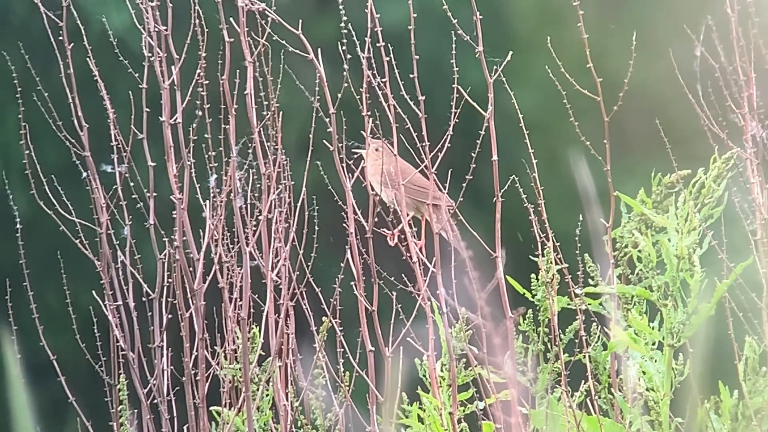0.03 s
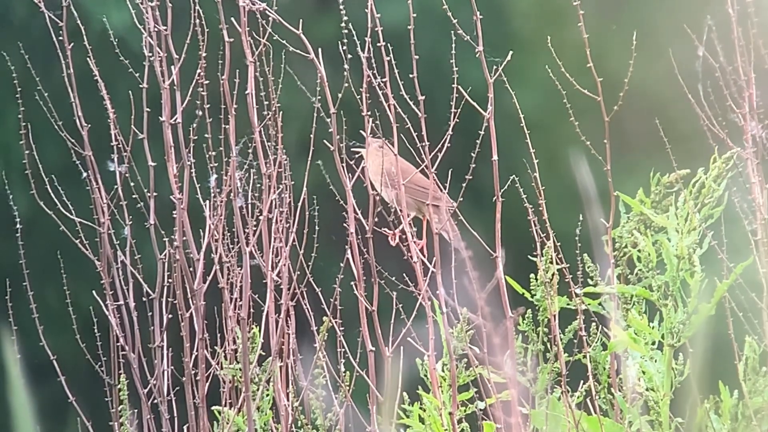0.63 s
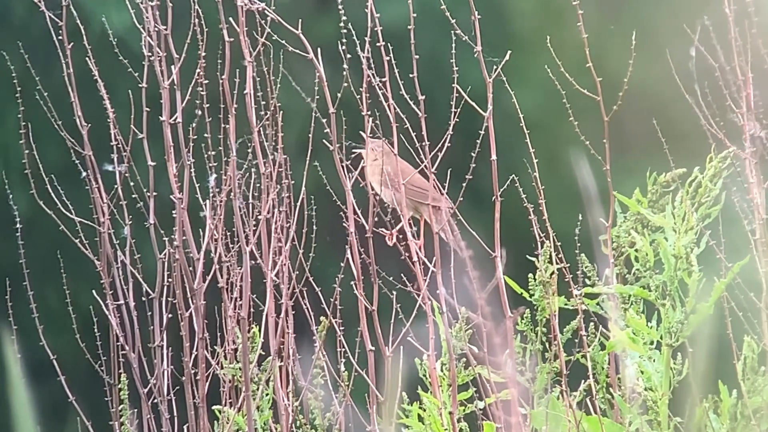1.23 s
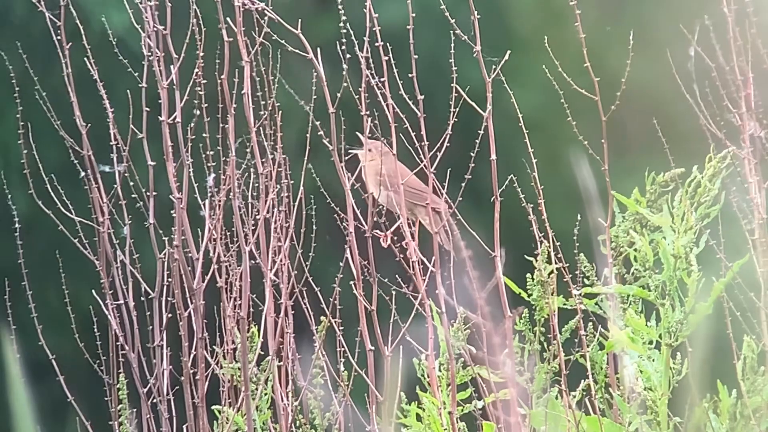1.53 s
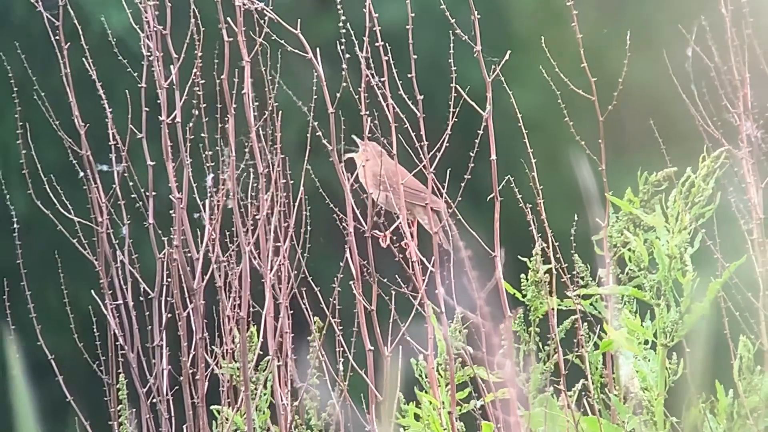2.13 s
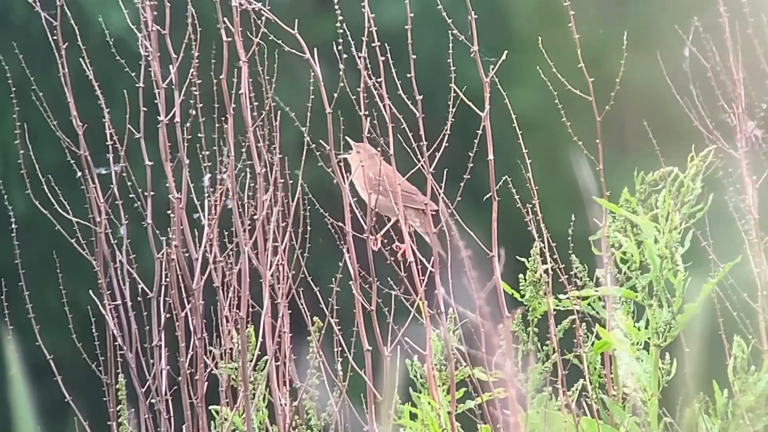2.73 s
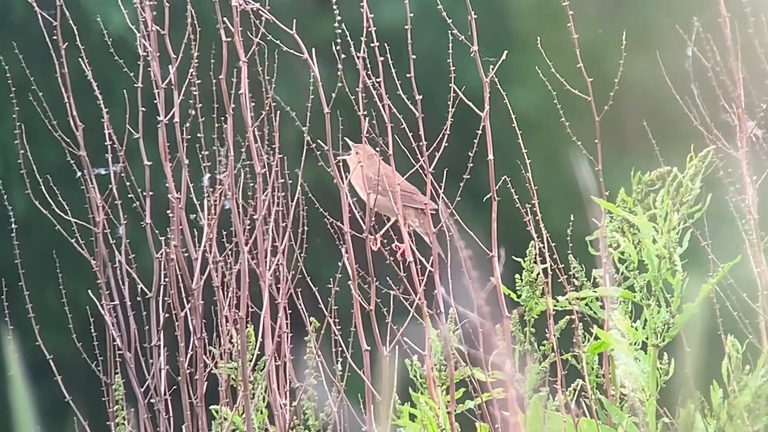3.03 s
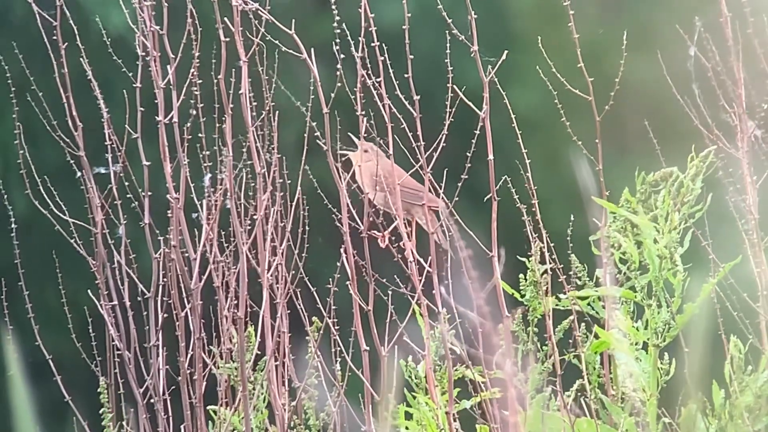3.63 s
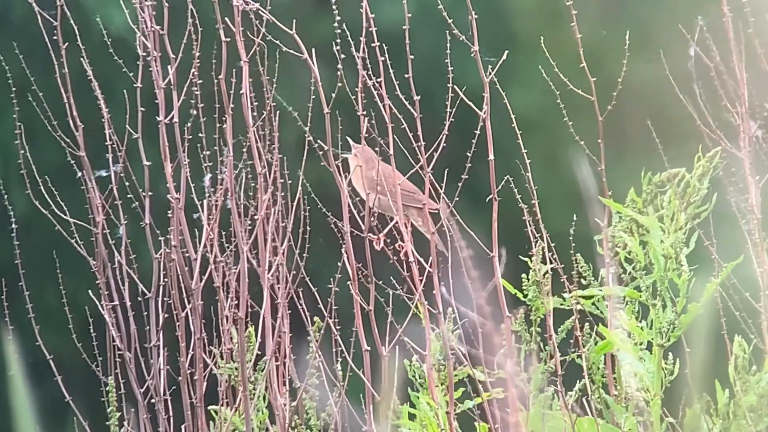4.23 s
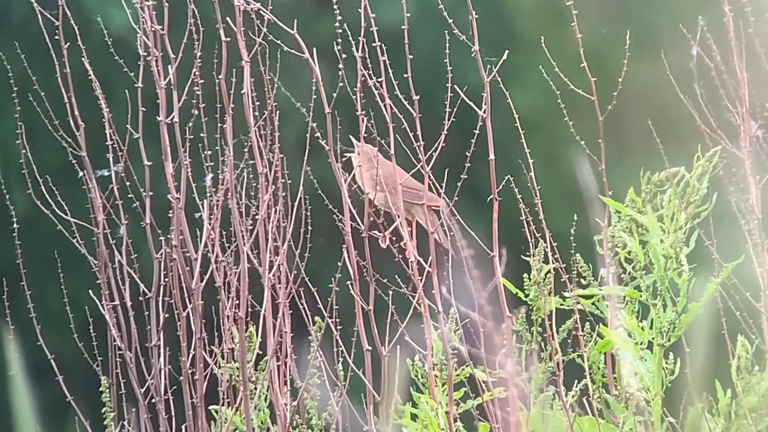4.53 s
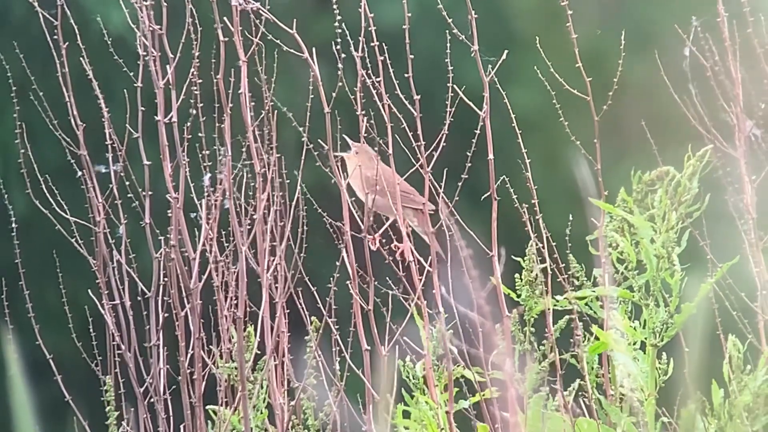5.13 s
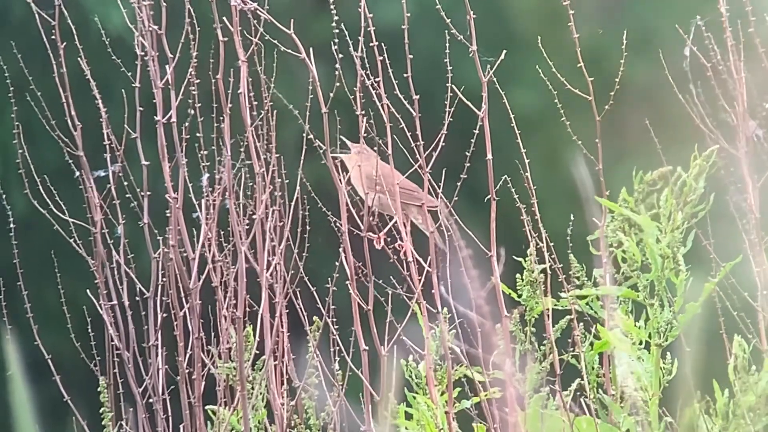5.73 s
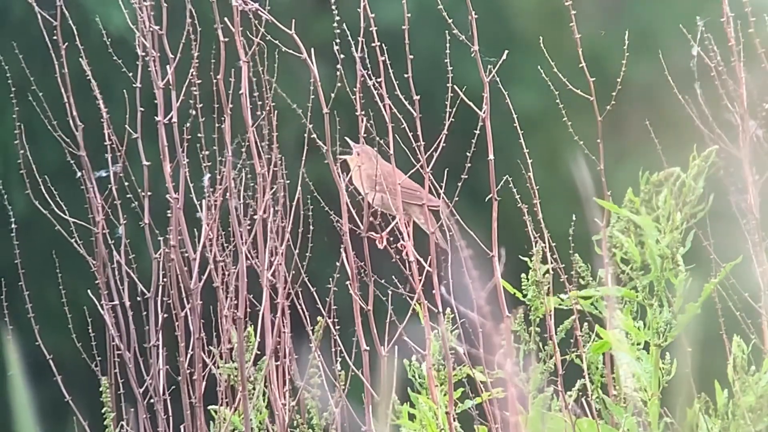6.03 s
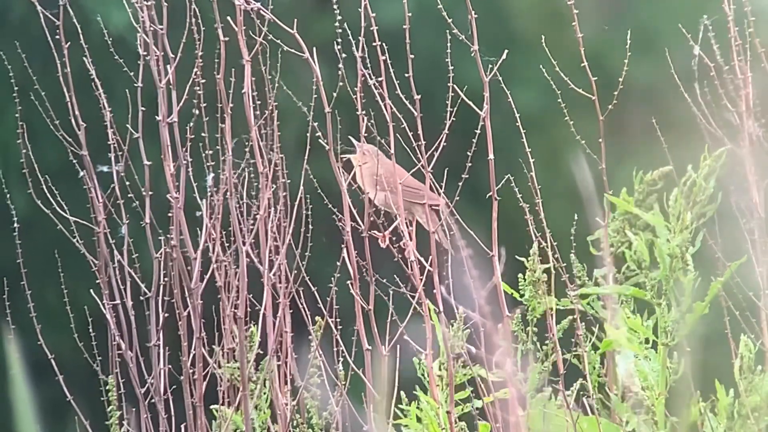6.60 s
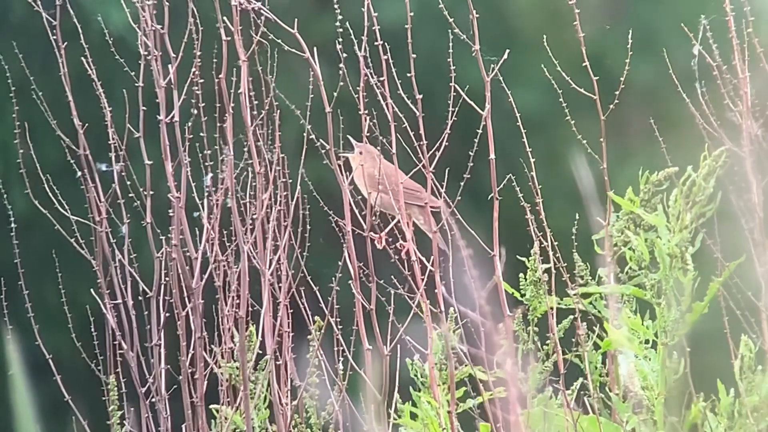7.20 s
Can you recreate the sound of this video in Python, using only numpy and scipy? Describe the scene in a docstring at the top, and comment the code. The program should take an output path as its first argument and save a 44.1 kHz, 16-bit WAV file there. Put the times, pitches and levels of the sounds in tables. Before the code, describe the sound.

A warbler sings a high, insect-like buzzing trill outdoors for the whole seven and a half seconds, pulsing evenly about nine times a second, each pulse a tiny pip and rattle. Beneath it lie soft low air noise and a steady high hiss. A second songbird nearby chatters in hurried chirps, buzzes and slurs from the start to about 1.5 seconds, adds a faint note or two near 2.3, and returns busily from 3.5 to 5.2 seconds. A distant thrush gives soft fluting whistles around 1 second, faintly near 3, and again from 5.8 to the end. Faint twittering comes from deep in the thicket, and the songs echo slightly off trees. From about 3.4 seconds, wind gusts rumble on the microphone with short low thumps, strongest between 5.6 and 6.5 seconds and again near 7.2, while the trill carries on.

```python
"""A river warbler reels its buzzing song from dry stems: nine phrases a second, each a pip, two thin
notes and a rattle, all near-sine tones of the syrinx. A second songbird chatters nearby in
frequency-modulated notes, a thrush whistles far off, and faint birds twitter in the thicket.
Stems and trees reflect the songs over a steady background: low air noise and a high hiss at 6-7 kHz.
From the middle on, the eddies of wind gusts rumble on the microphone."""
import sys
import numpy as np
from scipy import signal
from scipy.fft import rfft, irfft
from scipy.io import wavfile
from scipy.ndimage import uniform_filter1d

SR = 44100
rng = np.random.default_rng(int(sys.argv[2]) if len(sys.argv) > 2 else 0)


def log_audio(samples):
    """Write samples as a 16-bit WAV file to the path given in sys.argv[1]."""
    # one column per channel
    frames = np.atleast_2d(samples).T
    # limit to full scale, then quantise
    limited = np.clip(frames, -1, 1)
    pcm = np.round(limited * 32767).astype(np.int16)
    wavfile.write(sys.argv[1], SR, pcm)


N = 320166
FREQS = np.fft.rfftfreq(N, 1 / SR)

# Levels in the tables are relative: mixing gains and filters follow.
# the warbler's changing effort: time_s, pip_db, other_notes_gain_db, pip_octave_db
WARBLER_EFFORT = [(0, -45.5, -0.5, -31), (0.501, -45.5, 2, -16.5), (1.203, -49, -0.6, -25.5),
                  (1.9, -48.5, 0, -16.5), (2.6, -46, -3.5, -37), (3.45, -50, -1.5, -27.5),
                  (4.001, -49, -0.5, -22.5), (4.55, -54, -3, -18), (5, -50.5, 0.5, -24),
                  (5.5, -41.5, 1.5, -25), (5.898, -47, -3.2, -26), (6.5, -45, -2, -32),
                  (7.2, -48.5, -1.5, -21)]
# the two notes after each pip: delay_s, length_s, start_hz, end_hz, level_db
THIN_NOTES = [(.009, 0.008, 6865, 7480, -55), (0.0445, 0.011, 7145, 6560, -54)]
# echoes off the trees: delay_s, left_db, right_db
TREE_ECHOES = [(0.011, -22.5, -9.5), (0.0265, -16.5, -29), (0.038, -36, -18.5)]
# comb filtering of the warbler by stems and ground: frequency_hz, left_db, right_db
COMB_BANDS = [(4050, -14, -14), (4210, 2.5, 2.5), (4420, 4.5, 4.5), (4600, 2.5, 2.5), (4760, -9, -6),
              (4960, -5, -2), (5170, 4.5, 7.5), (5480, -11, -8), (5680, 6, 6.5), (5900, 5.5, 6.5),
              (6080, 1.5, 2.5), (6250, -6, -3), (6820, 3, 4), (7100, -5, -4), (7380, 6, 7)]
# steady outdoor background, low air noise plus a high hiss at 6-7 kHz: frequency_hz, density_db
BACKGROUND_SPECTRUM = [(15, -41), (28, -16), (55, 1), (100, -3.5), (220, -15.5), (600, -15), (1020, -20.5),
                       (1400, -31), (3200, -36), (5500, -30.5), (6100, -17), (7000, -25), (9000, -55)]
# likeness of the background in left and right: frequency_hz, correlation
BACKGROUND_CORRELATION = [(100, 0.83), (250, 0.82), (400, 0.15), (600, -0.33), (1000, -0.75), (2000, -0.54),
                          (6000, 0.9)]
# the chatterer's smooth slurs: start_s, length_s, level_db, start_hz, middle_hz, end_hz
SLURS = [ (0.051, 0.12, -58.5, 3580, 3920, 4860), (0.231, 0.097, -56.5, 3620, 3780, 4700),
         (0.426, 0.039, -48, 4510, 3770, 3780), (0.5, 0.034, -42, 3630, 3787, 3800),
         (0.573, 0.085, -59.5, 3180, 3130, 3065), (0.699, 0.029, -49.5, 2620, 3930, 3970),
         (0.894, 0.021, -49.5, 4220, 3840, 3650), (0.966, 0.013, -52.5, 3620, 3900, 3700),
         (1.36, 0.029, -59, 3180, 3040, 3100), (2.265, 0.027, -64, 3500, 3820, 3700),
         (2.388, 0.077, -58.5, 3550, 4024, 3840), (3.585, 0.035, -53.5, 4060, 4160, 3880),
         (3.728, 0.042, -43.5, 3210, 3280, 3690), (3.883, 0.021, -43, 3130, 3540, 3160),
         (4.033, 0.018, -47, 3820, 3480, 2980), (4.122, 0.03, -43, 3780, 3533, 3320),
         (4.36, 0.035, -46.5, 5860, 5410, 5780), (5.191, 0.032, -55, 2437, 3070, 3140),
         (4.676, 0.036, -45.5, 3460, 3310, 3170)]
# its buzzes: start_s, length_s, level_db, start_hz, end_hz, warble_hz, depth_hz, rasp_hz
BUZZES = [ (0.238, 0.069, -55.5, 5270, 5400, 130, 202, 302),
          (0.287, 0.094, -52.5, 6420, 6050, 90, 354, 400), (0.444, 0.066, -45.5, 3490, 3592, 112, 339, 86),
          (0.606, 0.083, -55, 5500, 4900, 200, 347, 710), (0.721, 0.033, -43.5, 3840, 3330, 183, 367, 130),
          (0.813, 0.041, -51.5, 5370, 4620, 120, 149, 510), (0.999, 0.04, -53.5, 2870, 2435, 110, 292, 210),
          (1.181, 0.024, -50.5, 3640, 3570, 72, 250, 220), (1.281, 0.051, -51.5, 3976, 3023, 96, 280, 300),
          (1.443, 0.078, -58, 2560, 2910, 107, -400, 350), (1.56, 0.031, -57.5, 3155, 3010, 133, 356, 280),
          (3.469, 0.097, -55, 4460, 4910, 130, 135, 404), (3.561, 0.032, -49.5, 4600, 4080, 130, 80, 200),
          (3.719, 0.028, -57, 3210, 3360, 230, 397, 199), (3.785, 0.091, -52.5, 3950, 4310, 152, 177, 240),
          (3.894, 0.081, -48, 3000, 3220, 61, 450, 20), (4.139, 0.028, -42, 3892, 3083, 115, 295, 80),
          (4.328, 0.08, -48.5, 5860, 5660, 120, 260, 260), (4.546, 0.043, -49.5, 3230, 4130, 340, 551, 247),
          (4.578, 0.053, -55.5, 5000, 4670, 150, 192, 410), (4.759, 0.057, -50, 2960, 3915, 167, -380, 300),
          (4.849, 0.021, -61, 3250, 2940, 136, 302, 100), (4.928, 0.057, -52, 3190, 3410, 152, -380, 120),
          (4.988, 0.052, -54, 5350, 4630, 113, 256, 450), (5.051, 0.029, -44.5, 3740, 3760, 140, 405, 160),
          (5.153, 0.1, -59, 2620, 2670, 100, 220, 250)]
# its chips, single or in runs: start_s, count, level_db, pitch_hz, sweep_octaves
CHIPS = [(0.842, 3, -45.5, 3634, -0.55), (0.982, 1, -51, 2930, 0.28), (3.469, 1, -57.5, 3440, -0.24),
         (4.205, 3, -48.5, 2766, 0.22), (4.313, 1, -50, 3610, 0.56), (4.453, 1, -47, 3310, 0.28),
         (4.49, 1, -55, 2820, -0.5), (5.078, 2, -44, 3574, -0.44)]
# its throat, which weakens the lowest notes: frequency_hz, gain_db
THROAT_RESPONSE = [(1500, -30), (2000, -12), (2500, 0), (6500, 0)]
# the thrush's whistles: start_s, length_s, level_db, start_hz, middle_hz, end_hz
WHISTLES = [ (0.822, 0.066, -63.5, 2120, 2484, 2620), (0.882, 0.22, -76, 1730, 1845, 2025),
            (1.131, 0.063, -63, 2260, 2410, 2670), (1.27, 0.1, -75.5, 2220, 2050, 1910),
            (1.324, 0.069, -64.5, 2700, 2365, 2410), (2.831, 0.048, -69.5, 2630, 2480, 2670),
            (2.912, 0.059, -74, 1760, 1850, 1780), (3.229, 0.15, -71, 1820, 1710, 1575),
            (3.955, 0.1, -69.5, 2070, 1900, 1640), (2.52, 0.068, -72.5, 1820, 1804, 1740),
            (6.051, 0.058, -76, 1860, 1750, 1720), (6.169, 0.051, -78, 1850, 1880, 1820),
            (5.825, 0.078, -67, 1954, 2230, 2070), (5.886, 0.087, -66.5, 2110, 2037, 2065),
            (6.375, 0.021, -67.5, 2430, 1920, 1700), (6.394, 0.043, -68, 2420, 1840, 1600),
            (6.407, 0.11, -71, 1730, 1730, 1930), (6.514, 0.099, -65, 1945, 2042, 1900),
            (6.675, 0.16, -64.5, 2460, 2524, 2760), (6.826, .1, -61, 2726, 2280, 1934),
            (7.019, 0.16, -73.5, 1950, 2030, 1960), (7.106, 0.11, -67.5, 1730, 1765, 2020),
            (7.202, 0.061, -60.5, 2020, 1985, 2050)]
# slurs deep in the thicket: start_s, length_s, level_db, start_hz, middle_hz, end_hz
FAR_SLURS = [(1.93, 0.049, -65.5, 2400, 2660, 2800), (2.038, .035, -68.5, 3150, 3450, 3700),
             (2.715, 0.041, -85, 3300, 3430, 3650), (2.925, 0.047, -70.5, 3200, 3550, 3600),
             (3.001, 0.14, -70.5, 3330, 3520, 3950), (3.107, 0.022, -69.5, 3650, 3160, 2680),
             (3.148, 0.094, -69, 2700, 2950, 3440)]
# distant repeated slurs: start_s, count, period_s, length_s, level_db, start_hz, end_hz
FAR_SERIES = [(2.189, 5, .1185, 0.0244, -69.5, 3080, 2250), (6.322, 16, .04, 0.035, -75.5, 3490, 4150)]
# gusts on the microphone: peak_s, level_db, swell_time_constant_s
GUSTS = [(3.399, -38, 0.092), (3.83, -48, 0.12), (4.109, -42.5, 0.12), (4.74, -41, 0.11), (5.02, -45, 0.15),
         (5.392, -46, 0.35), (5.693, -35, 0.044), (5.826, -33, 0.045), (6.113, -41, 0.22),
         (6.266, -35.5, 0.062), (6.41, -37, 0.055), (6.8, -50, 0.99), (7.25, -35, 0.093)]
# spectrum of the wind's eddies: frequency_hz, density_db
RUMBLE_SPECTRUM = [(15, -36), (30, -33.5), (52, 9.5), (90, 6.5), (140, -8), (220, -16.5), (350, -28.5),
                   (700, -64), (2000, -100)]
# spectrum of the finer eddies in a hard gust: frequency_hz, density_db
FLUTTER_SPECTRUM = [(50, -11), (110, 8.5), (170, 4.5), (300, -15), (450, -24.5), (800, -57), (2000, -99)]
# sharp buffets within the gusts: peak_s, level_db, frequency_hz
BUFFETS = [(3.403, -29.5, 80), (4.106, -32, 59.8), (4.197, -30, 115.1), (4.437, -32.5, 159.3),
           (4.523, -43, 149), (4.602, -36, 142), (4.767, -32, 117), (5.362, -32, 80.4), (5.672, -29, 120),
           (5.811, -32, 109), (5.977, -28.5, 108.8), (6.253, -28, 143), (6.267, -28, 77.3),
           (6.395, -31, 160), (6.414, -38, 310), (7.174, -26, 223)]
# the microphone's response: frequency_hz, gain_db
MIC_RESPONSE = [(20, 3), (7200, 0), (7500, -19.5), (7850, -41.5), (8400, -38.5), (10500, -9.5),
                (12100, -7.5), (13000, -25.5)]
# spectrum of its self-noise: frequency_hz, density_db
HISS_SPECTRUM = [(6000, -17), (9300, -16.5), (10500, -3.5), (12100, -4), (12700, -1.5), (14000, -12.5),
                 (14900, -11.5), (16000, -38)]


def amp(db):
    """Converts decibels to an amplitude ratio."""
    return 10 ** (np.asarray(db) / 20)


def unit(x):
    """Normalises to rms 1."""
    return x / np.sqrt(np.mean(x ** 2) + 1e-20)


def spectrum(points):
    """Interpolates a curve over a logarithmic frequency axis."""
    hz, value = np.transpose(points)
    return np.interp(np.log(FREQS + 1), np.log(hz), value)


def filtered(x, response):
    """Linear filtering: multiplies the spectrum by a response given in decibels."""
    return irfft(rfft(x) * amp(spectrum(response)), N)


def add(mix, start_s, sound):
    """Superposition: sums a sound into the mix at a given time."""
    start = round(start_s * SR)
    sound = sound[max(-start, 0):]
    part = mix[max(start, 0):][:len(sound)]
    part += sound[:len(part)]


def noise(density, correlation):
    """Partly coherent stereo noise of rms 1: the balance of mid and side sets the correlation."""
    mid, side = rfft(rng.standard_normal((2, N)))
    mid, side = mid * np.sqrt(1 + correlation), side * np.sqrt(1 - correlation)
    return unit(irfft(np.array([mid + side, mid - side]) * amp(spectrum(density)), N))


def wander(count, per_s):
    """Random modulation of about unit size, interpolated between per_s values a second."""
    steps = np.arange(count) * per_s / SR
    return np.interp(steps, np.arange(2048), rng.standard_normal(2048))


def glide(length_s, start_hz, middle_hz, end_hz):
    """A parabolic frequency contour through three points."""
    u = np.linspace(0, 1, max(round(length_s * SR), 8))
    return start_hz * (1 - u) * (1 - 2 * u) + middle_hz * 4 * u * (1 - u) + end_hz * u * (2 * u - 1)


def sweep(length_s, start_hz, end_hz):
    """The frequency contour of a linear chirp."""
    return glide(length_s, start_hz, (start_hz + end_hz) / 2, end_hz)


def tone(hz, taper, octave_db=-60):
    """Near-sinusoidal oscillation of the syrinx, with tapered ends and a weak second harmonic."""
    phase = 2 * np.pi * (np.cumsum(hz) / SR + rng.random())
    wave = np.sin(phase) + amp(octave_db) * np.sin(2 * phase)
    return np.sqrt(2) * wave * signal.windows.tukey(len(hz), taper)


def warbler(first_s=-.0945, period_s=.11143, jitter_s=.0005):
    """Periodic repetition makes a reel: a falling pip, a thin upsweep, a thin downsweep, a rattle."""
    out = np.zeros(N)
    times, *curves = np.transpose(WARBLER_EFFORT)
    for beat in np.arange(first_s, N / SR, period_s):
        s = beat + jitter_s * rng.standard_normal()
        pip_db, effort_db, octave_db = (np.interp(s, times, curve) for curve in curves)
        pip_db -= .6 * rng.standard_normal()
        stretch, bend = rng.standard_normal(2)
        pip_hz = glide(.0085 * (1 + .13 * stretch), 6400, 6060, 6020) * (1 + .008 * bend)
        pip_hz += 70 * wander(len(pip_hz), per_s=700)
        octave_db += 2.9 * rng.standard_normal()
        add(out, s - .0004, amp(pip_db) * tone(pip_hz, taper=.24, octave_db=octave_db))
        for delay_s, length_s, start_hz, end_hz, db in THIN_NOTES:
            hz = sweep(length_s, start_hz, end_hz)
            hz += 130 * wander(len(hz), per_s=630)
            gain = amp(effort_db + db + 1.7 * rng.standard_normal())
            add(out, s + delay_s, gain * tone(hz, taper=.16))
        add(out, s, amp(effort_db) * rattle())
    return out


def rattle(onset_s=.0562, sweep_s=.0026, pulse_db=-52, growth_db=3, count=14):
    """A pulse train of steep downward chirps that slows and grows louder as it goes."""
    out, s = np.zeros(SR // 8), onset_s
    pace = 1 + .013 * rng.standard_normal()
    for progress in np.linspace(0, 1, count):
        size, bend, slip = rng.standard_normal(3)
        bottom_hz = np.interp(progress, [0, .35, .87, 1], [4900, 4200, 3850, 4200])
        hz = glide(sweep_s, 7500, bottom_hz + 950, bottom_hz) * (1 + .018 * bend)
        gain = amp(pulse_db + growth_db * progress + size)
        add(out, s + .00015 * slip, gain * tone(hz, taper=.5, octave_db=-28))
        s += pace * np.interp(progress, [0, .85, .92], [.0032, .0042, .0053])
    return out


def scatter(x, t60_s, delay_s):
    """Diffuse reverberation: dense reflections of random sign decay exponentially in each channel."""
    t = np.arange(SR) / SR
    signs = rng.choice([-1., 1.], (2, SR))
    arrivals = (rng.random((2, SR)) < 1 / 8) * (t > delay_s)
    taps = signs * arrivals * amp(-60 * t / t60_s)
    taps /= np.linalg.norm(taps, axis=1, keepdims=True) + 1e-20
    return signal.fftconvolve(x[None], taps, axes=1)[:, :N]


def outdoors(x, stems_db, trees_db, t60_s):
    """Multipath propagation: direct sound, quick scatter off stems, a tail and echoes from trees."""
    out = x + amp(stems_db) * scatter(x, t60_s=.071, delay_s=.00018)
    out += amp(trees_db) * scatter(x, t60_s, delay_s=.0052)
    for delay_s, *levels_db in TREE_ECHOES:
        for channel, db in zip(out, levels_db):
            add(channel, delay_s, amp(db) * x)
    return out


def combed(pair):
    """Interference of stem and ground reflections gives each channel its own peaks and dips."""
    bands = np.array(COMB_BANDS)
    return np.array([filtered(pair[0], bands[:, [0, 1]]), filtered(pair[1], bands[:, [0, 2]])])


def ports(pair, left_lag_rad):
    """Phase difference: the sound meets the two microphone ports out of step."""
    rotation = np.exp(.5j * left_lag_rad * np.array([[-1], [1]]))
    return (signal.hilbert(pair) * rotation).real


def background(level_db=-57):
    """Stationary noise: low air noise plus a high hiss, like diffuse birdsong or distant insects."""
    return amp(level_db) * noise(BACKGROUND_SPECTRUM, spectrum(BACKGROUND_CORRELATION))


def syllable(hz, warble_hz=71, depth_hz=70, rasp_hz=55.4):
    """Coupled frequency and amplitude modulation: a warbling note whose pitch frays at random."""
    count = len(hz)
    phase = 2 * np.pi * np.cumsum(warble_hz * (1 + .12 * wander(count, per_s=120))) / SR
    warble = depth_hz * (.67 + .47 * wander(count, per_s=68)) * np.cos(phase)
    rasp = rasp_hz * wander(count, per_s=1100)
    # a positive depth sounds on the falling strokes, a negative one on the rising strokes
    stroke_db = 4.9 * np.tanh(abs(depth_hz) / 350) * np.sin(phase)
    pulsing = amp(stroke_db + 1.2 * wander(count, per_s=400))
    return unit(pulsing * tone(hz + warble + rasp, taper=.5))


def slurs(notes):
    """Gliding tones with the slight frequency modulation of a vibrato."""
    out = np.zeros(N)
    for s, length_s, db, *pitches_hz in notes:
        add(out, s, amp(db) * syllable(glide(length_s, *pitches_hz)))
    return out


def chatterer(chip_s=.0129, chip_period_s=.0185):
    """Source and filter: hurried buzzes, slurs and runs of chips pass through the bird's throat."""
    out = np.zeros(N)
    for s, length_s, db, start_hz, end_hz, *modulation in BUZZES:
        add(out, s, amp(db) * syllable(sweep(length_s, start_hz, end_hz), *modulation))
    out += slurs(SLURS)
    for s, count, db, pitch_hz, octaves in CHIPS:
        hz = sweep(chip_s, pitch_hz * 2 ** (-octaves / 2), pitch_hz * 2 ** (octaves / 2))
        for k in range(round(count)):
            add(out, s + k * chip_period_s, amp(db) * syllable(hz, warble_hz=0, depth_hz=0))
    return filtered(out, THROAT_RESPONSE)


def far_twitter(level_db=-75.5, count=100, from_s=.6, until_s=4.2, fade_db_per_s=1.03):
    """A random succession of faint glides from birds deep in the thicket, fading with time."""
    out = np.zeros(N)
    for k, (slip, length, pitch, slope, arch, size) in enumerate(rng.uniform(-1.3, 1, (count, 6))):
        centre_hz = 2720 * 1.45 ** pitch
        hz = centre_hz * glide(.026 * 2 ** length, 1 + .12 * slope, 1 + .07 * arch, 1 - .12 * slope)
        s = from_s + (until_s - from_s) * (k + slip) / count
        db = level_db - fade_db_per_s * s + 4 * size + 3 * pitch
        add(out, s, amp(db) * tone(hz, taper=.7))
    return out


def thrush():
    """Nearly pure tones in slow, fluting glides."""
    out = np.zeros(N)
    for s, length_s, db, *pitches_hz in WHISTLES:
        hz = glide(length_s, *pitches_hz)
        hz += 10 * wander(len(hz), per_s=470)
        add(out, s, amp(db) * tone(hz, taper=.32))
    return out


def far_songs(jitter_s=.002, spread_db=1.5, spread_octaves=.03):
    """Distant single slurs, and quasi-periodic series of one chirp that varies a little each time."""
    out = slurs(FAR_SLURS)
    for s, count, period_s, length_s, db, start_hz, end_hz in FAR_SERIES:
        for k in range(round(count)):
            slip, size, pitch = rng.standard_normal(3)
            hz = sweep(length_s, start_hz, end_hz) * 2 ** (spread_octaves * pitch)
            hz += 80 * wander(len(hz), per_s=270)
            add(out, s + k * period_s + jitter_s * slip, amp(db + spread_db * size) * tone(hz, taper=.32))
    return out


def gust_strength(fall_ratio=.69):
    """Gusts add in power; each swells exponentially and dies away a little faster."""
    t, power = np.arange(N) / SR, np.zeros(N)
    for peak_s, db, swell_s in GUSTS:
        time_constants = np.maximum(peak_s - t, (t - peak_s) / fall_ratio) / swell_s
        power += (amp(db) * np.exp(-np.minimum(time_constants, 20))) ** 2
    return np.sqrt(power)


def wind(rumble_db=-1, flutter_db=-48.5, hard_gust_db=-39, flutter_exponent=2.3):
    """Turbulent pressure: eddies rumble with the gusts, and finer ones grow by a steeper power law."""
    strength = gust_strength()
    eddies = noise(RUMBLE_SPECTRUM, correlation=.95)
    eddies /= np.sqrt(uniform_filter1d((eddies ** 2).mean(0), size=3500))  # the gusts set the envelope
    flutter = noise(FLUTTER_SPECTRUM, correlation=1) * (strength / amp(hard_gust_db)) ** flutter_exponent
    return amp(rumble_db) * eddies * strength + amp(flutter_db) * flutter


def buffets(gain_db=.5):
    """Pressure pulses: the strongest eddies shove the diaphragm once, back and forth."""
    out = np.zeros(N)
    t = np.arange(-SR // 25, SR // 25) / SR
    for peak_s, db, hz in BUFFETS:
        pulse = np.cos(2 * np.pi * hz * t) / np.cosh(3.8 * hz * t)
        add(out, peak_s + t[0], amp(db + gain_db) * pulse)
    return out


def scene():
    """Superposition of background, wind and birds, each bird with its own level and reverberation."""
    reel = combed(outdoors(warbler(), stems_db=-9, trees_db=-9, t60_s=.5))
    birds = amp(-1.84) * ports(reel, left_lag_rad=1.145)
    birds += amp(.64) * outdoors(chatterer(), stems_db=-5.5, trees_db=-6.5, t60_s=.45)
    birds += outdoors(thrush(), stems_db=-7, trees_db=-10, t60_s=.75)
    birds += outdoors(far_songs(), stems_db=-6, trees_db=-4, t60_s=.6)
    birds += outdoors(far_twitter(), stems_db=3, trees_db=14, t60_s=.9)  # mostly echo
    return birds + background() + wind() + buffets()


def record(dry, hiss_db=-89, cutoff_hz=15100):
    """Transduction: a microphone with a deep notch above 7.5 kHz, its self-noise, then a low-pass."""
    out = filtered(dry, MIC_RESPONSE) + amp(hiss_db) * noise(HISS_SPECTRUM, correlation=0)
    low_pass = signal.firwin(511, cutoff_hz, window=("kaiser", 9), fs=SR)
    return signal.oaconvolve(out, low_pass[None], "same")


dry = scene()
out = record(dry)
log_audio(out)
```